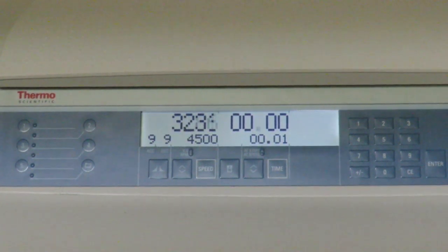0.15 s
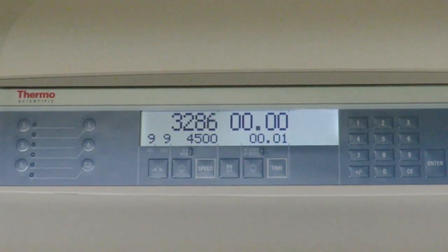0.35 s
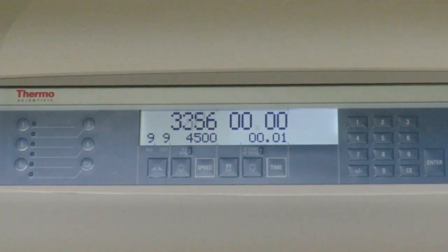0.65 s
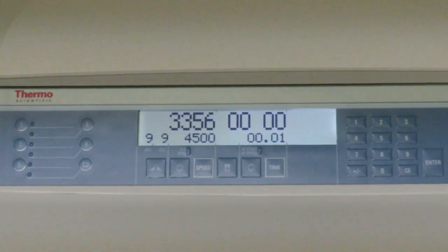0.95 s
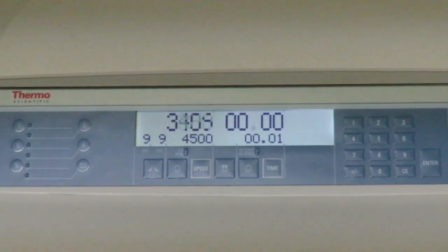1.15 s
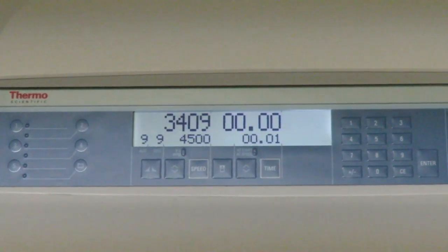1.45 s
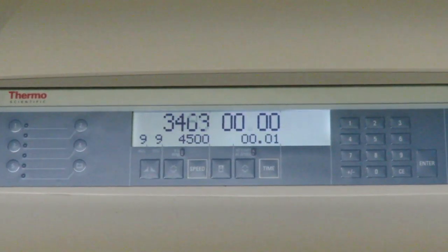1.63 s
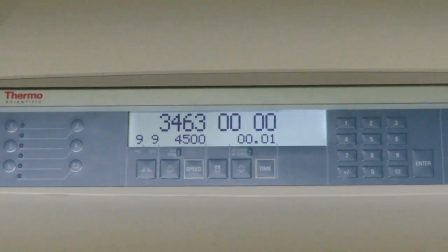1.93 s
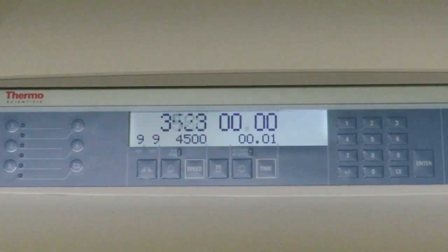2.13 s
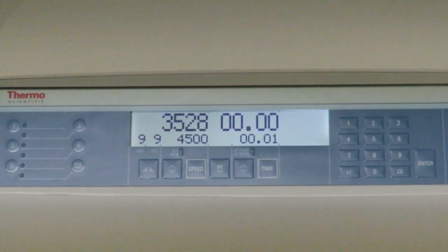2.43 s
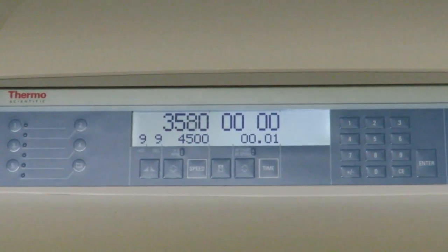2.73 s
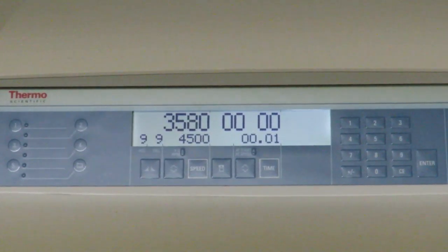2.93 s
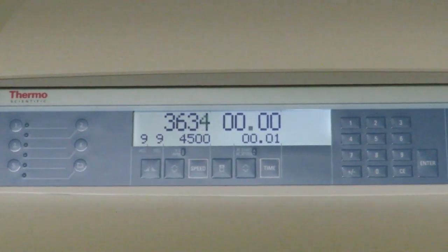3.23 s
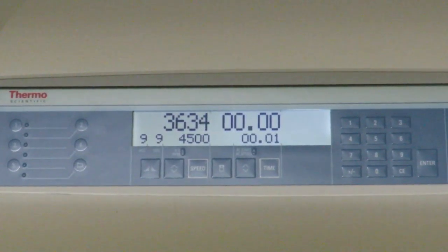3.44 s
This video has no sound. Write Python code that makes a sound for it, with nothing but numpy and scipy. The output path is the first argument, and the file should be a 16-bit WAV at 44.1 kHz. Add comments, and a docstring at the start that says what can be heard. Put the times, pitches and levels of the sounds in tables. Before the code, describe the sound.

Laboratory centrifuge spinning up, a steady low hum rising slightly in pitch over a muffled airy roar

```python
"""On a lab bench, heard close to its front panel, a centrifuge spins up behind its closed lid.
Four buckets sweep the bowl and sing at four times the shaft rate, with an octave above;
stirred air, made of filtered noise, roars in the housing's resonances and grows with speed;
shaft, motor and bearing lines, sines at multiples of the shaft rate, whine faintly near resonances."""
import sys
import numpy as np
from scipy import signal
from scipy.fft import rfft, irfft, next_fast_len
from scipy.io import wavfile
from scipy.ndimage import uniform_filter1d

SR = 44100
rng = np.random.default_rng(int(sys.argv[2]) if len(sys.argv) > 2 else 0)


def level_to_linear(level):
    """Convert decibel levels to linear amplitude factors, elementwise."""
    exponent = np.asarray(level, float) / 20
    return 10 ** exponent


def store_pcm(level_fs):
    """Save levels as 16-bit WAV."""
    pcm = np.round(np.clip(level_fs, -1, 1) * 32767).astype(np.int16)
    wavfile.write(sys.argv[1], SR, np.atleast_2d(pcm).T)


N = 157878  # samples

# Speed of the shaft. Each row: time in seconds, shaft rate in turns per second.
SHAFT_SPEED = [(0, 54.65), (.6, 55.75), (1.2, 57.03), (1.8, 58.28), (2.4, 59.38), (3.0, 60.43),
               (3.58, 61.5)]
# Bucket tone, which crosses a null of the housing. Each row: time in seconds, tone in dB rms before
# its wobble, its octave in dB rms, the tone in the side channel in dB rms.
BUCKET_LEVELS = [(0, -15, -28, -47), (.12, -16, -29.5, -45), (.24, -13.5, -27.5, -43),
                 (.4, -15.5, -26, -46), (.6, -15.5, -28.5, -43), (.72, -14.3, -28.5, -41),
                 (1.05, -17, -25, -47), (1.35, -17.3, -27.5, -47), (1.54, -20, -29.5, -55),
                 (1.63, -26.5, -29.5, -48.5), (1.7, -30, -31, -46), (1.75, -40, -31.5, -44),
                 (1.82, -27, -31.5, -43), (1.95, -25.5, -31.5, -40), (2.15, -24, -33, -37),
                 (2.3, -21, -34.5, -42), (2.5, -20, -34, -41.5), (2.72, -16, -35, -41.5),
                 (3.0, -14.7, -36, -42), (3.15, -13.5, -41, -40), (3.4, -11.2, -39, -37),
                 (3.58, -12, -40, -35)]
# Shaft, motor and bearing lines. Each row: multiple of the shaft rate, level on resonance in dB rms
# before its wander, resonance that lets it out in Hz, resonance width in Hz.
WHINE_LINES = [(1.0, -45, 58, 90), (2.0, -43, 117, 90), (44.0, -50, 2660, 220), (49.0, -57, 2700, 90),
               (86.5, -65, 4820, 150), (82.2, -67, 4570, 110), (84.4, -66, 4810, 110),
               (81.4, -58, 4785, 85), (81.5, -66, 4860, 150), (78.2, -57, 4786, 40),
               (203.0, -77, 11550, 450), (201.0, -75, 11900, 350), (204.0, -78, 12050, 600)]
# Colour of the air roar. Each row: frequency in Hz, relative density in dB per Hz.
AIR_COLOUR = [(25, -77), (45, -69.5), (80, -61.5), (140, -58), (200, -47.5), (300, -50.5), (500, -53.5),
              (800, -55), (1300, -58), (2000, -69), (2700, -75), (2800, -77.5), (3300, -81), (4500, -86),
              (5200, -90.5), (6500, -95.5), (9000, -101), (11000, -102), (13000, -107), (15500, -112)]
# Housing resonances. Each row: centre in Hz, width in Hz, height over the roar in dB (negative dips).
HOUSING_RESONANCES = [(58, 36, 5), (117, 20, 9.5), (222, 24, 6.5), (250, 30, 2), (460, 40, -3),
                      (481, 21, -8), (331.6, 27, 4.5), (380, 40, 5.5), (437, 47, 3.5), (523.6, 24, 4.5),
                      (584, 30, 5), (649, 39, 3), (699, 38, 7.5), (773, 56, -4.5), (877.4, 40, 10),
                      (912.3, 32, 11), (988.3, 26, 8.5), (1043, 26, 4.5), (1130, 16, 1.5), (1248, 32, 5.5),
                      (1291, 30, 4.5), (1360, 18, -4.5), (1422, 44, 5), (1556, 14, -2), (1750, 55, 5),
                      (1900, 48, 6.5), (1993, 40, 6), (2310, 50, -4), (2226, 60, 6.5), (2462, 80, 4.5),
                      (2568, 100, 6), (3030, 90, -6.5), (3020, 67, 4), (3490, 63, 1.5), (4100, 100, 5),
                      (4270, 71, 4.5), (4530, 100, 0.5), (4810, 90, 4.5), (11550, 120, 2),
                      (11950, 150, 2.5), (7340, 1200, 3.5), (9860, 80, 3), (11250, 600, 1)]
# How the roar follows speed. Each row: frequency in Hz, growth in dB per 10 turns a second.
SPEED_GROWTH = [(60, 3), (250, 5), (500, 3), (1000, 2), (2000, 7), (4000, 5.5), (8000, 4.5), (12000, 6)]
# Stereo width before trims. Each row: frequency in Hz, side minus mid in dB.
STEREO_WIDTH = [(40, -34), (60, -25.5), (140, -23), (220, -21), (320, -14.5), (500, -19), (800, -17.5),
                (1100, -17), (1700, -17.5), (2600, -13.5), (4000, -12.5), (8000, -6.5), (12000, -6.5)]

SIDE_LEAD_RAD, OCTAVE_LEAD_RAD = 1.0, -1.3  # phase of side over mid, for bucket tone and octave
OCTAVE_SIDE_DB = -25  # side octave relative to mid octave
WOBBLE_DB, WOBBLE_HZ = .4, 12  # scale and rate of the bucket tone's level wobble
AIR_DB = -21  # rms of the roar in the mid channel
SWELL_DB, FLICKER_DB = 1, 1.2  # scale of the whole roar's slow swell and of each band's faster flicker
SIDE_RING = .4  # share of the resonances (in dB) left in the diffuse side sound
SHAKE_RAD, SHAKE_HZ = .011, 70  # scale and rate of the shaft jitter that blurs the high lines
LINE_SIDE_DB = -6  # trim of the lines' stereo width
PATCHY_DB = 2.2  # scale of the level wander of a line at 80 times the shaft rate


def on_log(table, hz):
    """Read (Hz, value) points on a log-frequency axis."""
    points = np.array(table, float)
    return np.interp(np.log(np.maximum(hz, 1)), np.log(points[:, 0]), points[:, 1])


def walk(rate):
    """Random levels held 1 / rate seconds and slewed twice; spread near 0.4."""
    hold = int(SR / rate)
    steps = np.repeat(rng.standard_normal(N // 500 + 1), hold)
    slewed = uniform_filter1d(steps, hold)[:N]
    return 0.56 * uniform_filter1d(slewed, hold)


def buckets(t, turn):
    """Four buckets pass a point four times a turn: a tone and its octave, in mid and side."""
    times, *levels_db = np.array(BUCKET_LEVELS, float).T
    # root 2 turns an rms level into a sine's peak
    tone, octave, tone_side = (np.sqrt(2) * level_to_linear(np.interp(t, times, db)) for db in levels_db)
    wobble = level_to_linear(WOBBLE_DB * walk(WOBBLE_HZ))
    tone_phase = 4 * turn
    octave_phase = 8 * turn + 1
    mid = tone * wobble * np.sin(tone_phase) + octave * np.sin(octave_phase)
    side = tone_side * np.sin(tone_phase + SIDE_LEAD_RAD)
    side = side + level_to_linear(OCTAVE_SIDE_DB) * octave * np.sin(octave_phase + OCTAVE_LEAD_RAD)
    return np.array([mid, side])


def air(shaft):
    """Stirred air through the housing's resonances, in half-octave steps that grow with speed and flicker."""
    size = next_fast_len(N)
    f = np.arange(size // 2 + 1) * SR / size
    ring = 1  # power gain of the housing
    for hz, width, db in HOUSING_RESONANCES:
        ring = ring + (level_to_linear(2 * db) - 1) / (1 + (2 * (f - hz) / width) ** 2) ** 2
    ring = np.maximum(ring, .01)
    colour = level_to_linear(on_log(AIR_COLOUR, f)) * np.sqrt(ring)
    side_colour = colour * ring ** ((SIDE_RING - 1) / 2) * level_to_linear(on_log(STEREO_WIDTH, f))
    mid = rfft(rng.standard_normal(size)) * colour
    side = rfft(rng.standard_normal(size)) * side_colour
    octaves = np.log2(np.maximum(f, 1) / 30)
    swell = walk(1.5)
    roar = 0
    for centre in np.arange(-1, 9.6, .5):  # octaves above 30 Hz
        # neighbouring bands overlap and add up to one
        band = np.cos(np.pi / 2 * np.clip(2 * (octaves - centre), -1, 1)) ** 2
        growth_db = on_log(SPEED_GROWTH, 30 * 2 ** centre) * (shaft - shaft.mean()) / 10
        db = growth_db + SWELL_DB * swell + FLICKER_DB * walk(10)
        roar = roar + level_to_linear(db) * irfft(np.array([mid * band, side * band]), size)[:, :N]
    return roar * level_to_linear(AIR_DB) / np.std(roar[0])


def whines(shaft, turn):
    """Shaft, motor and bearing lines, each loudest where the shaft rate carries it across its resonance."""
    mid = side = 0
    for multiple, db, hz, width in WHINE_LINES:
        wander_db = PATCHY_DB * np.sqrt(multiple / 80) * walk(6.8)
        resonance = 1 / (1 + (2 * (multiple * shaft - hz) / width) ** 2) ** 2
        gain = np.sqrt(2) * level_to_linear(db + wander_db) * resonance
        shaken_turn = turn + SHAKE_RAD * walk(SHAKE_HZ)
        phase = multiple * shaken_turn + 2 * np.pi * rng.random()
        mid = mid + gain * np.sin(phase)
        side = side + gain * level_to_linear(on_log(STEREO_WIDTH, hz) + LINE_SIDE_DB) * np.cos(phase)
    return np.array([mid, side])


def scene():
    """Tones, roar and whines driven by one shaft, mid and side turned into left and right."""
    t = np.arange(N) / SR
    shaft = np.interp(t, *np.array(SHAFT_SPEED).T)
    turn = 2 * np.pi * np.cumsum(shaft) / SR  # shaft angle in radians
    mid, side = buckets(t, turn) + air(shaft) + whines(shaft, turn)
    return np.array([mid + side, mid - side])


def low_pass(x):
    """Removes everything above the highest recorded frequency."""
    return signal.sosfilt(signal.butter(12, 15140, fs=SR, output="sos"), x)


def record(dry):
    """Pass on the finished stereo mix."""
    return low_pass(dry)


dry = scene()
out = record(dry)
store_pcm(out)
```